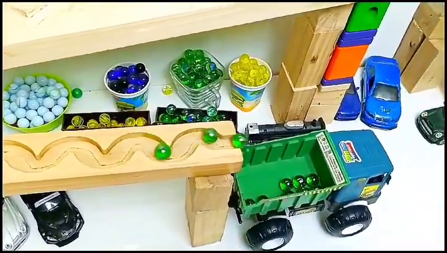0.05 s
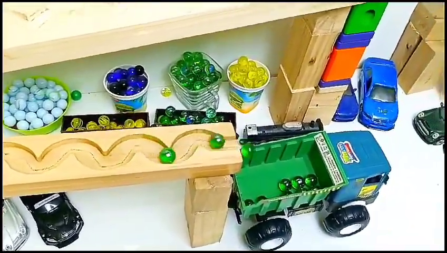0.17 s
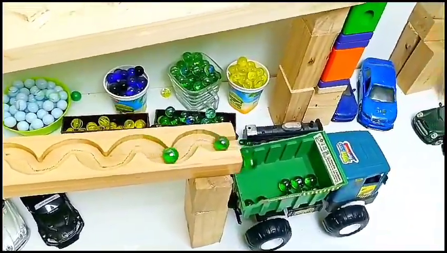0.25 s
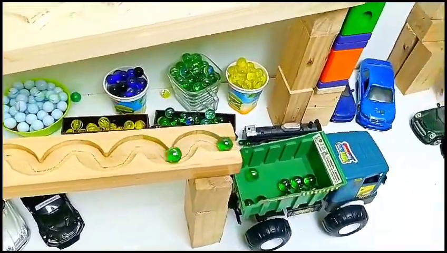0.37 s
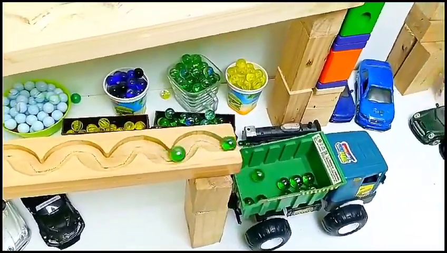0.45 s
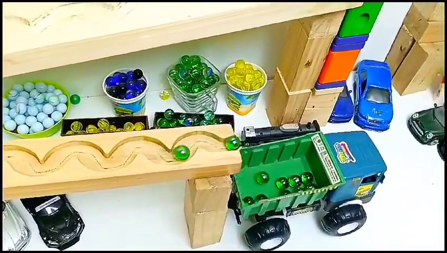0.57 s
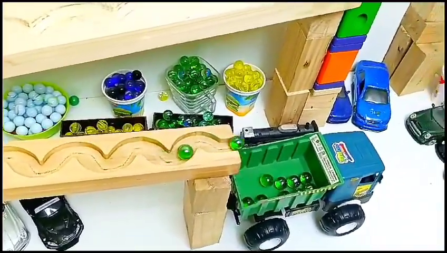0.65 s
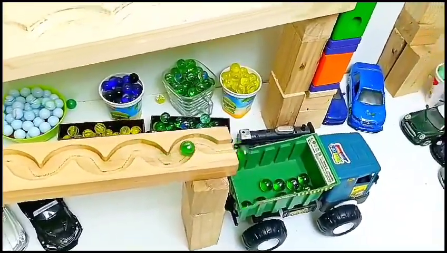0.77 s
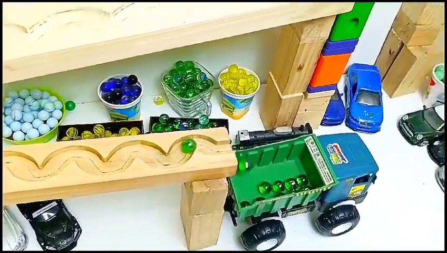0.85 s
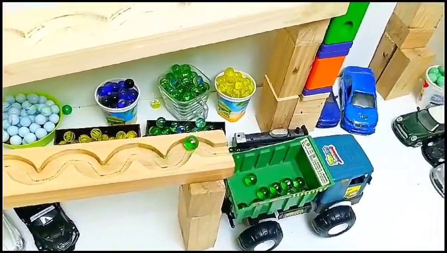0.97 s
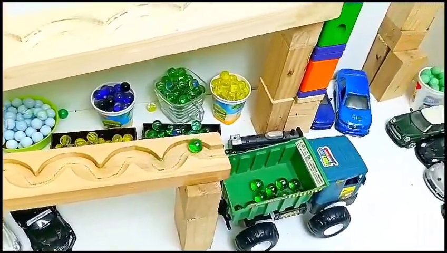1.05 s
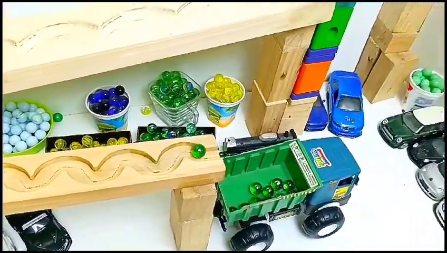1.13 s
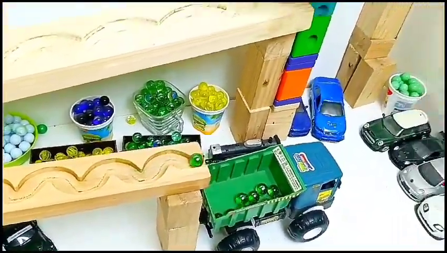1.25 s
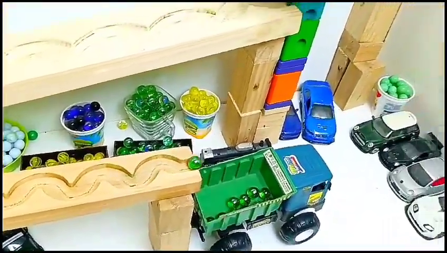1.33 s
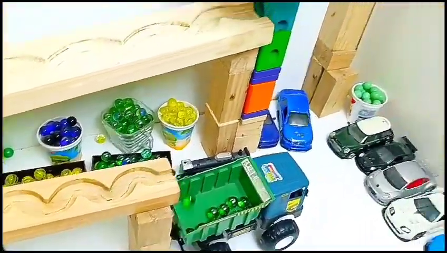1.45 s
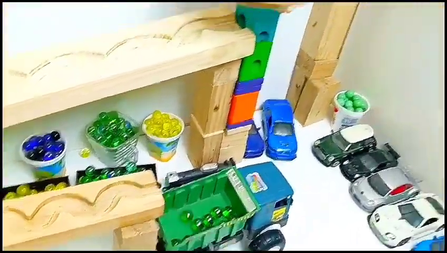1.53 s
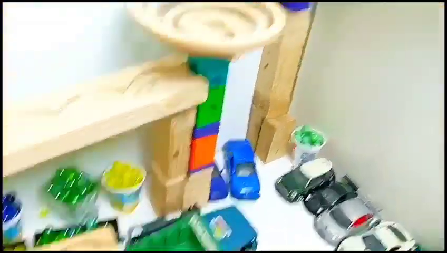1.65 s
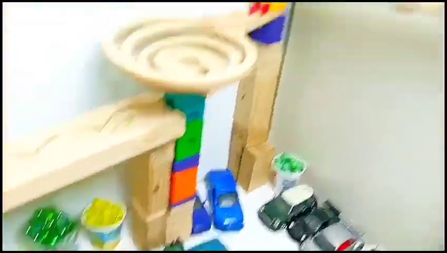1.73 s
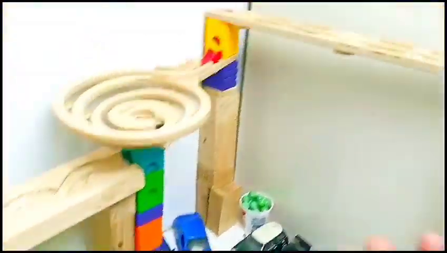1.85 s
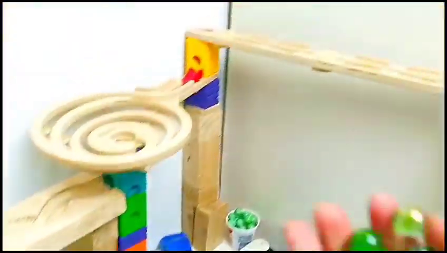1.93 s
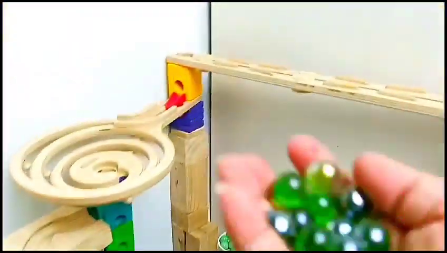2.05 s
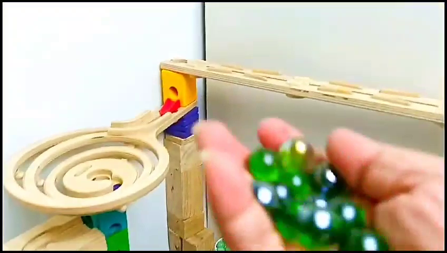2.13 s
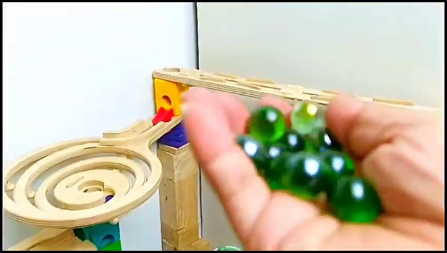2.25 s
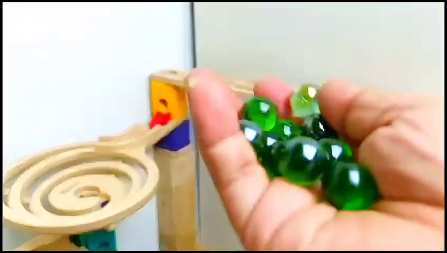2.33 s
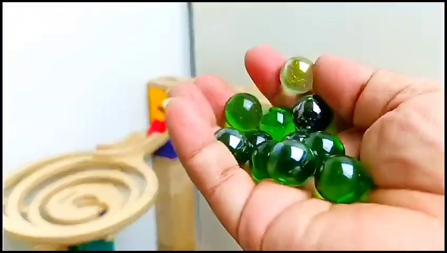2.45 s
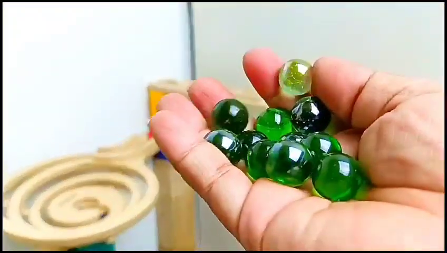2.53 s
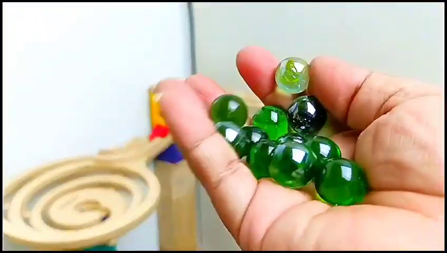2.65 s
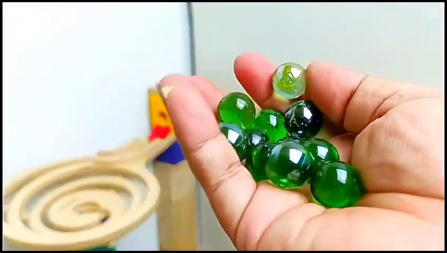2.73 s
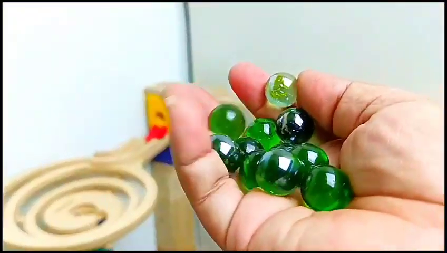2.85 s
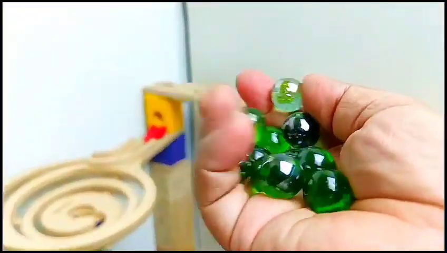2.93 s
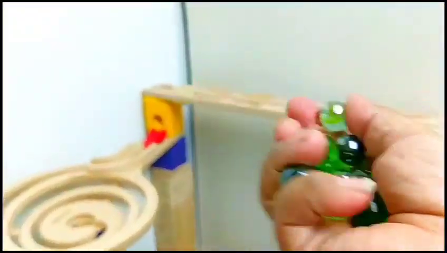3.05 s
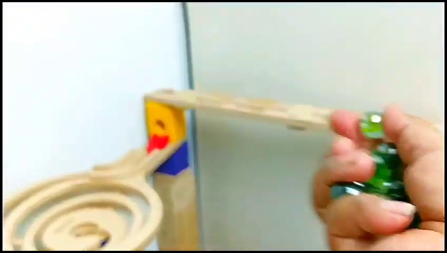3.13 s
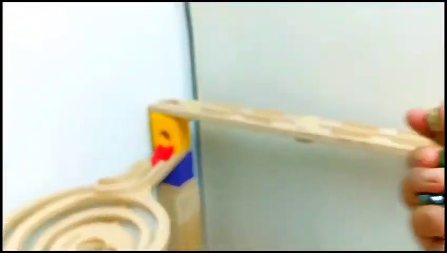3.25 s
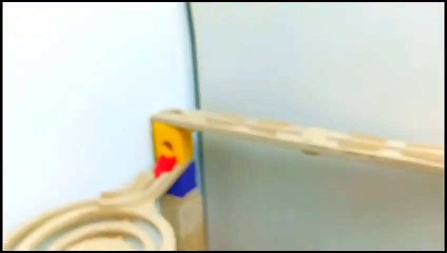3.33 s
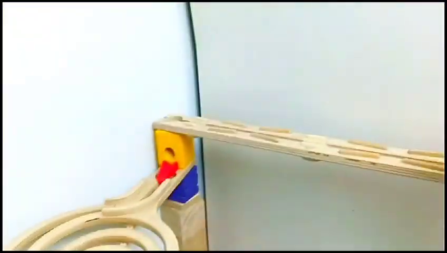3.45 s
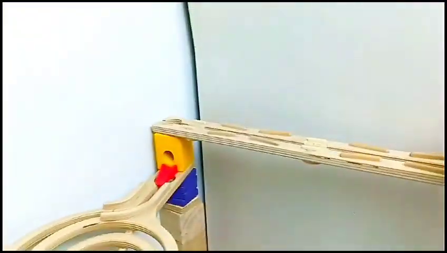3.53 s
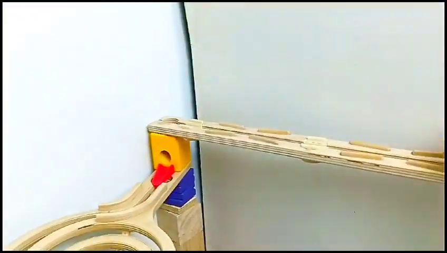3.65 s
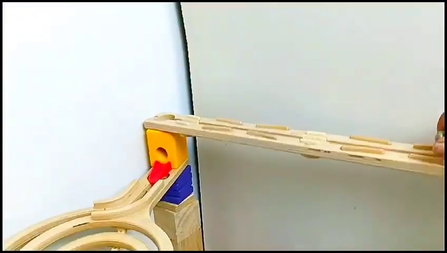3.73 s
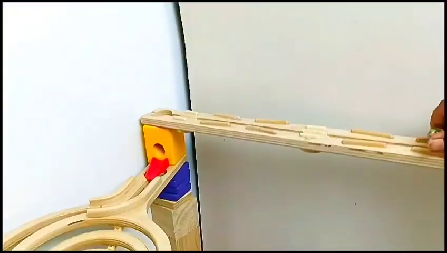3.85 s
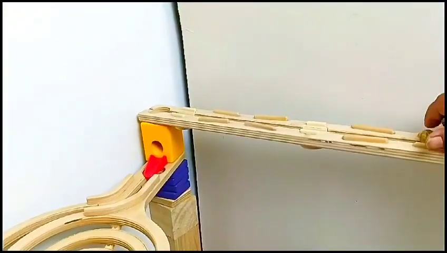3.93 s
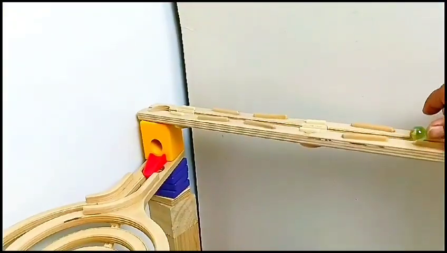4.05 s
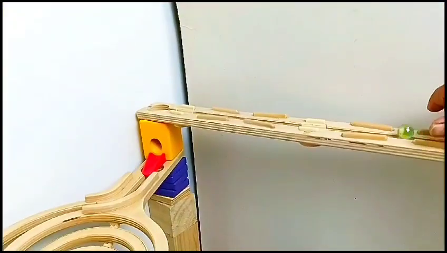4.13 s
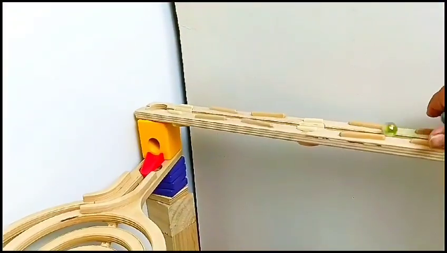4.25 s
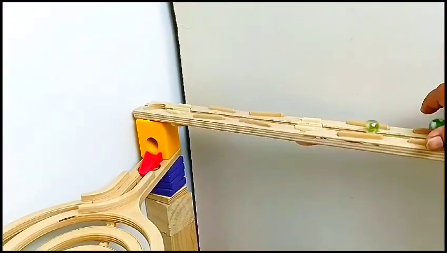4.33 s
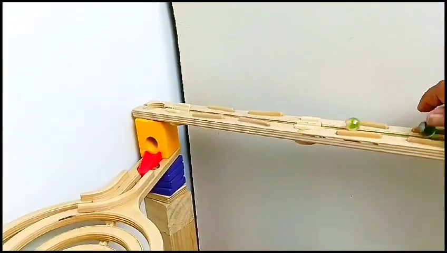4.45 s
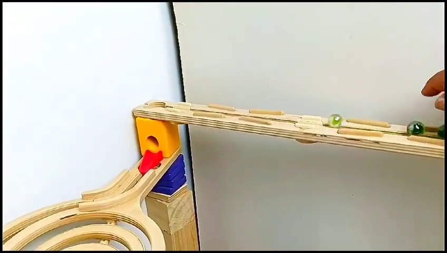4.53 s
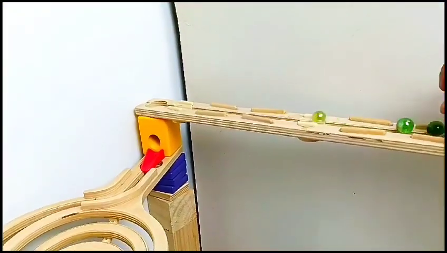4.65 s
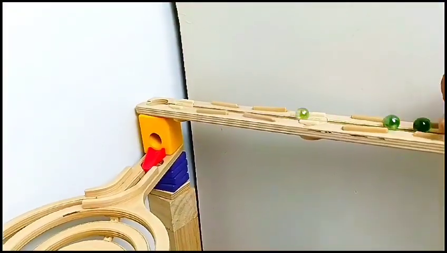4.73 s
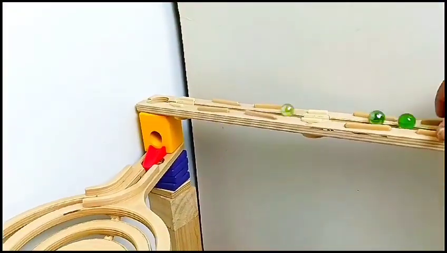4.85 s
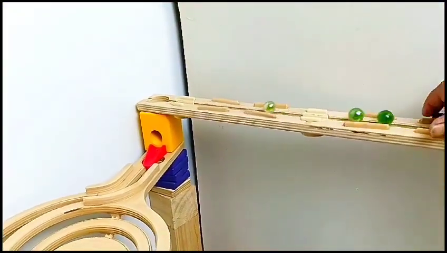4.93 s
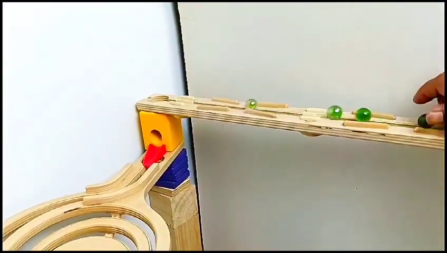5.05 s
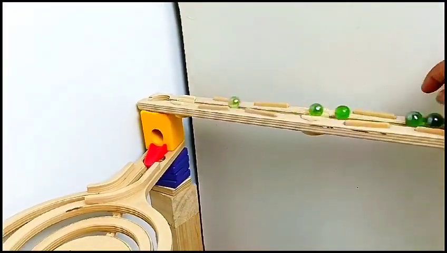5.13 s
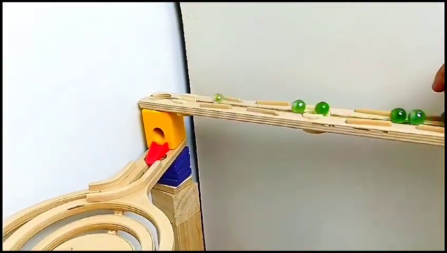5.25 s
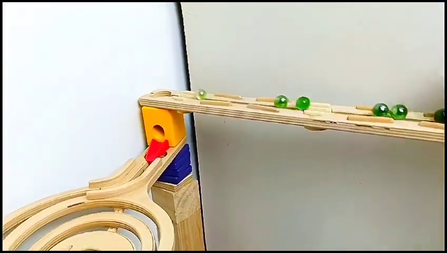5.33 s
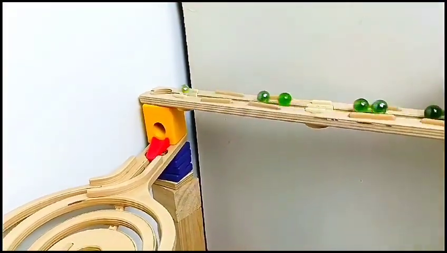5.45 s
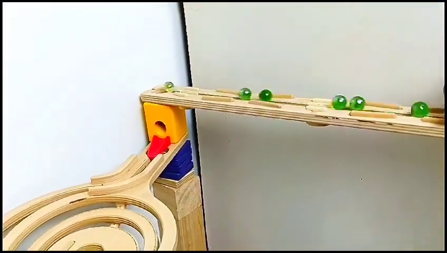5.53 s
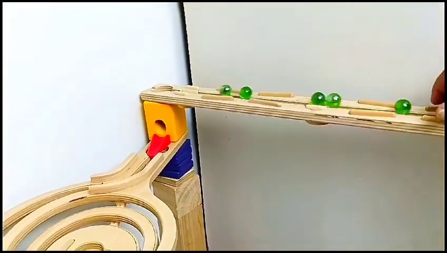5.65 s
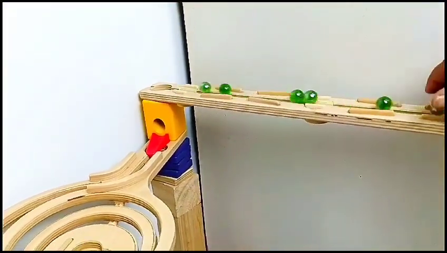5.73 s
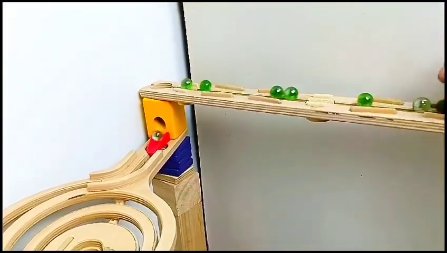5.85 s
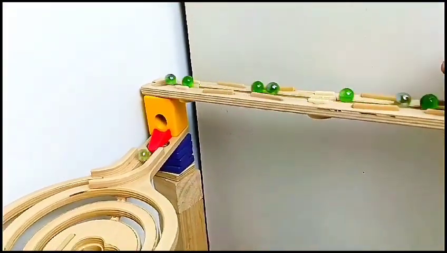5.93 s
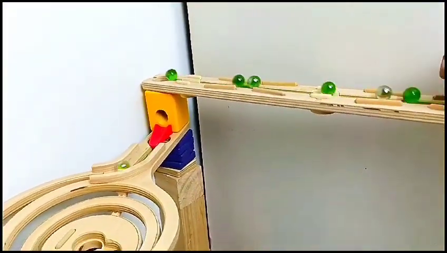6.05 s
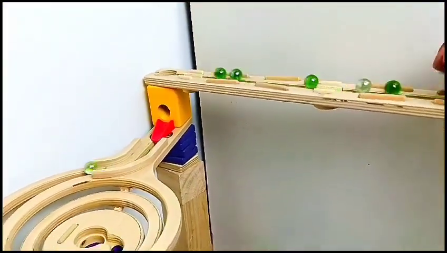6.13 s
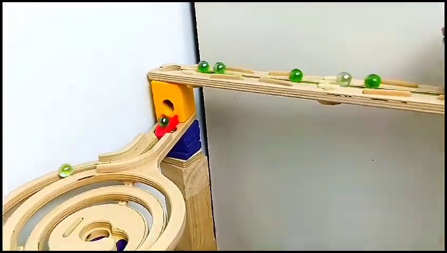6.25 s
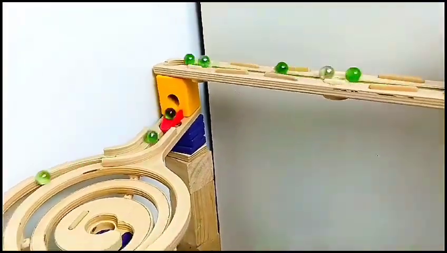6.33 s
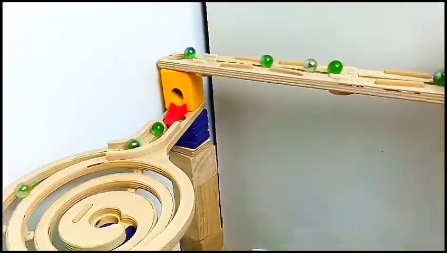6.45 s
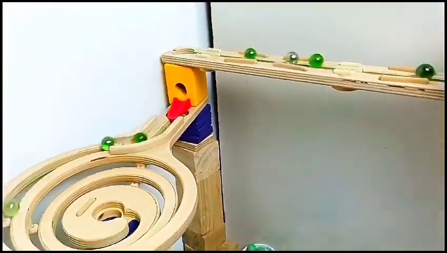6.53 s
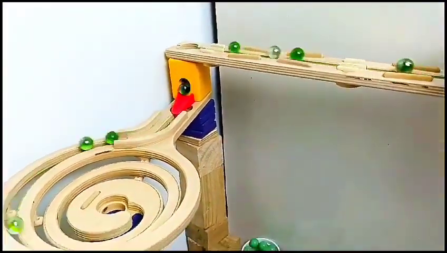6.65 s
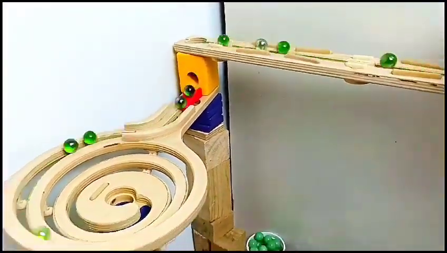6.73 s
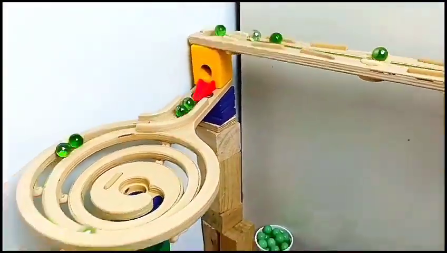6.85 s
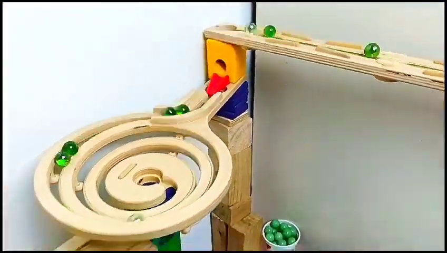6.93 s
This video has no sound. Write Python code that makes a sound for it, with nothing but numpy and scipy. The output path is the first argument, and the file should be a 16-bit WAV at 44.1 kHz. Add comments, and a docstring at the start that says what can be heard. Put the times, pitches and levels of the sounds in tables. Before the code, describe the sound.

Close stereo phone pickup in a hard, reverberant room: deep, stretched knocks and a low woody drone, a big hollow plastic blow, a tiny gap of silence, then bright marble drops rattling in a toy truck bed. Light glass ticking in the palm fades to near quiet. Wood knocks begin singly, multiply, and merge with rolling rumble and sharp glass clinks, loudest at the end over faint hush.

```python
"""Glass marbles on plastic and wood

Glass marbles drop into the plastic bed of a toy truck, click in a hand, then knock and roll down a wooden track.
Blows excite modes and broad slaps, glass contacts give short pulses, and dense small blows make the rolling.
A low drone, handling rumble, low thuds and steady hush lie beneath; a bare room adds reflections and a long echo.
The phone plays its first second slowed and lowered, falls silent briefly, then runs on at speed."""
import sys
import numpy as np
from scipy import signal
from scipy.fft import rfft, irfft
from scipy.io import wavfile
from scipy.ndimage import uniform_filter1d, map_coordinates

SR = 44100
rng = np.random.default_rng(int(sys.argv[2]) if len(sys.argv) > 2 else 0)


def persist_wave(psi):
    """Save psi, clipped to +-1, as 16-bit WAV."""
    counts = np.round(np.clip(psi, -1, 1) * 32767).astype(np.int16)
    wavfile.write(sys.argv[1], SR, np.atleast_2d(counts).T)


N = 307818

# All t/s are playback times; happened() converts them to times in the room.

# Marbles landing in the plastic bed, except the row at 1.0 s: the abrupt cut-in as sound returns
# at full speed. t/s, peak level/dB, left-right level/dB, nominal contact time/ms
DROPS = [(.696, -1, 0.2, .15), (0.719, -29, 4.5, .25), (.774, -11.5, 1, .4), (.824, -9, -1.3, .3),
         (.869, -18, -4, .3), (0.9, -18.5, -3.5, .3), (1.0, -23, 8, .25), (1.011, -15, -2, .4),
         (1.033, -24.5, -1.5, .3), (1.1165, -3.5, -3, .2), (1.148, -12, 1.1, .45), (1.172, -9.5, -.4, .1),
         (1.204, -10.5, -2.8, .4), (1.225, -20.5, 0.5, .4), (1.236, -24.5, 4.5, .4),
         (1.258, -20.5, -1.6, .3), (1.6355, -3, -0.2, .2), (1.654, -26.5, 0.5, .15), (1.672, -17, 5.4, .25),
         (1.689, -9, -2, .25), (1.71, -13, 1.5, .08), (1.739, -29, -2.5, .25)]
# Modes of the bed: f/Hz, bandwidth/Hz, level/dB
BED_MODES = [(598.5, 111.4, -1), (660, 96, 2.5), (830, 230, -6.5), (970, 92, -3.5), (968, 40, -3.5),
             (1286, 130, -1.5), (1295, 240, -15.5), (1510, 280, -7.5), (1580, 130, -9.5), (2440, 590, -9.5),
             (3200, 410, -3.5)]
# The bed's many modes too close to tell apart: f/Hz, level/dB per Hz
BED_SLAP = [(150, -56.5), (250, -36), (335, -20), (470, -24.5), (620, -9.5), (842, -4.5), (1090, -17),
            (1280, -2), (1990, -10.5), (3180, -18), (4330, -18.5), (9570, -17.5), (12000, -37.5),
            (15600, -69), (22000, -120)]


def drops():
    """Impact excitation: a shorter contact gives a broader force spectrum and so a brighter sound."""
    sounds = []
    for _, _, _, contact_ms in DROPS:
        body = ring(BED_MODES, BED_SLAP, spot_db=1.0, slap_db=1.1)
        sounds.append(np.convolve(body, blow(contact_ms)))
    return place(DROPS, sounds)


def settling():
    """Dissipation: a rattle in the bed swells after each row of DROPS and calms down."""
    gain = stirred(DROPS, under_db=-48, rise_s=.05, t60=.38)
    return rolling(gain, BED_MODES, BED_SLAP, per_s=180.0, spread_db=8.8)


# Marbles striking pegs and walls: t/s, peak level/dB, left-right level/dB,
# change of the deep board modes' level/dB, wall ring f/Hz as played back
KNOCKS = [(.042, -37, 8.5, -4.5, 1014), (.216, -38, 2, -12, 890), (.298, -16.5, 2, -8, 734),
          (.359, -30, 1.5, -16, 695), (.489, -31.5, 1.5, -22, 836), (4.0181, -20, -2, -2, 2870),
          (4.0557, -23, 1, -2, 1790), (4.447, -20.5, -7.5, -19, 3000), (4.4521, -16.5, -3, 3, 2000),
          (4.4843, -17, 3.5, 1, 2704), (4.5728, -16.5, 0, -19, 1810), (4.6144, -22.5, 0.5, -4, 2090),
          (4.7738, -31.5, -1.5, -7, 3260), (5.0423, -18, -4, 1.9, 2830), (5.0716, -25, 1.5, 5, 3180),
          (5.1265, -30, -1, -3, 2020), (5.155, -23.5, 1, 0.7, 2860), (5.2185, -34.5, -1, -3, 2210),
          (5.3009, -14, -1.5, -4, 2800), (5.358, -21.5, -2, -10, 2730), (5.3897, -25.5, 4, 7.5, 3070),
          (5.4243, -35, 13, -3, 2740), (5.4535, -26, 1, -2.5, 2870), (5.5489, -32, 3, 3, 2840),
          (5.6351, -30.5, 2, 14.5, 2730), (5.7783, -16.5, 0.5, -13, 2290), (5.793, -14, 4.5, -1, 2786),
          (5.8318, -17.5, 6, 2.5, 2780), (5.8983, -21, -3.5, -1, 2220), (5.9795, -24, 4, -19, 2870),
          (6.0686, -22.5, -0.5, -6, 3610), (6.1601, -36.5, 9, 13, 2960), (6.1903, -16.5, 2, -4.5, 2630),
          (6.256, -22, -2, -37, 3040), (6.2724, -15, -3.5, -13, 3110), (6.3238, -15, 3.5, 4, 2790),
          (6.3607, -18, 3.5, -6, 2330), (6.483, -18, -1, -5.5, 2130), (6.5945, -25, -7.5, -33, 3360),
          (6.628, -17, 0, -6, 2930), (6.669, -17, -0.5, -1.5, 3110), (6.7557, -9, -2.5, -5, 2667),
          (6.8227, -18, -4, -3, 3840), (6.8598, -23.5, 4.5, -22, 3370), (6.9113, -24, 0, -8, 2850),
          (6.9638, -31, -13, 4, 3130)]
# Modes of the track: f/Hz, bandwidth/Hz, level/dB
TRACK_MODES = [(337, 17, -10), (446, 17, -19.5), (503.5, 23, 3), (719, 21, -7.5), (856.5, 35, -6),
               (1264, 140, -11.5), (1446, 120, -6.5), (2219, 64, -9.5), (2770, 24, -1), (3070, 190, -12.5),
               (3750, 61, -14), (4187, 40, -11.5)]
# The track's broad slap: f/Hz, level/dB per Hz
TRACK_SLAP = [(110, -41.5), (180, -18), (429, -11.5), (497, 1.5), (575, -19.5), (712, -10), (972, -18.5),
              (2770, -6), (4240, -13.5), (6380, -36.5), (9000, -34), (11700, -58.5), (19800, -120)]


def knocks():
    """Modal excitation: the board's deep modes and the nearest wall's ring vary from blow to blow."""
    deep_below_hz = 800
    deep_slap_db = 6  # extra bass of the slap over the change of the deep modes
    wall_width_hz, wall_db = 100, -1
    sounds = []
    for s, _, _, deep_db, wall_hz in KNOCKS:
        modes = [(hz, width, db + deep_db * (hz < deep_below_hz)) for hz, width, db in TRACK_MODES]
        modes.append((pitch_in_room(s, wall_hz), wall_width_hz, wall_db))
        slap = [(hz, db + (deep_db + deep_slap_db) * (hz < deep_below_hz)) for hz, db in TRACK_SLAP]
        body = ring(modes, slap, spot_db=2.6, slap_db=-1.5)
        sounds.append(np.convolve(body, blow(.06)))
    return place(KNOCKS, sounds)


# Steady roll of the marbles under way: t/s, level/dB
ON_TRACK = [(-.3, -59), (0.0, -52.5), (.3, -57.5), (.8, -73), (1.0, -91.5), (3.98, -85), (4.03, -64),
            (4.4, -82.5), (5.0, -64), (5.6, -56), (6.1, -47), (6.98, -43)]


def track_rolling():
    """Power addition: a steady roll combines with the commotion stirred up by every knock."""
    after_knocks = stirred(KNOCKS, under_db=-28, rise_s=.015, t60=.39)
    gain = np.hypot(level(ON_TRACK), after_knocks)
    return rolling(gain, TRACK_MODES, TRACK_SLAP, per_s=500., spread_db=4.5)


def rolling(gain, modes, slap, per_s, spread_db):
    """Granular excitation: dense small blows of uneven size drive the modes of a body."""
    out = np.zeros((2, N))
    for pan in (.3, .5, .7):  # three paths, each a share of left and right
        size = gain_of(spread_db * np.minimum(rng.exponential(1, N), 5))
        grit = size * (rng.random(N) < per_s / SR)
        grit *= rng.choice([-1., 1.], N)
        path = signal.oaconvolve(grit, ring(modes, slap, spot_db=.83, slap_db=-1.1))[:N]
        delay = int(40 * (1 - pan) - 8)  # samples
        out += [pan * np.roll(path, delay), (1 - pan) * path]
    return evened(out) * gain


# Glass on glass: t/s, peak level/dB, left-right level/dB, f/Hz as played back
CLICKS = [(-.022, -24.5, 7, 3450), (0.042, -30.5, -12, 3270), (0.088, -29, -8, 3340),
          (.2942, -40.5, -24, 3180), (.3586, -37.5, -6, 3130), (.5212, -49.5, -11.5, 3050),
          (.6983, -17.5, -7, 3055), (1.0003, -18, 3.5, 8920), (1.0526, -28, 0, 9210),
          (1.1162, -9.5, 4, 4400), (1.2488, -21.5, 1.5, 8440), (1.4691, -22, -19, 8650),
          (1.482, -24, -12, 8300), (1.562, -35, -9.5, 8350), (1.6349, -14.5, -1, 5040),
          (1.7148, -9, 3.5, 9570), (1.915, -38, -2, 7740), (2.1624, -36, 9, 9300), (2.1736, -25, 2.5, 8340),
          (2.2, -23, 4, 9030), (2.2145, -19, 4.5, 9600), (2.2657, -20, 2.5, 10300), (2.3163, -39, 1, 9400),
          (2.415, -37, 5.5, 9970), (2.4705, -43, 5, 8570), (2.702, -41, -3, 8270), (2.8471, -41, 5, 8000),
          (2.9214, -49, 9.5, 9530), (3.145, -27, 9, 8260), (3.2083, -50, 3.5, 8400), (3.243, -47, 2, 4400),
          (3.296, -34, 9, 5700), (3.354, -25.5, 4.5, 7970), (3.4226, -38, -2.5, 4650),
          (3.4261, -32.5, 0, 4870), (3.58, -36, -5.5, 5630), (4.452, -39.5, -13.5, 4306),
          (4.5534, -29, 2.5, 4330), (5.0436, -34.5, 1, 4260), (5.2674, -38.5, -7.5, 4300),
          (5.3036, -16.5, -6, 4140), (5.547, -27.5, 1.5, 4440), (5.6596, -41.5, 15.5, 8800),
          (5.7597, -18.5, -5, 7600), (5.779, -8.5, -1, 6940), (5.968, -20, .5, 5770),
          (5.976, -21.5, 2.5, 6230), (5.99, -21.5, 2, 5180), (6.0704, -26.5, 5.5, 5030),
          (6.1599, -14, -2, 5070), (6.1908, -15.5, 0, 7650), (6.2557, -10.5, 1, 9040),
          (6.2743, -9, 1, 6040), (6.3548, -12.5, 1.5, 5280), (6.4647, -17.5, 1, 6470),
          (6.4835, -17, 0.5, 5800), (6.5946, -15, 2, 7900), (6.634, -19, 4, 7600), (6.6694, -13, 3, 8000),
          (6.6833, -7.5, -4, 7800), (6.7559, -12, 4.5, 4430), (6.823, -13.5, 4.5, 8700),
          (6.872, -13, 2, 5750)]


def clicks():
    """Elastic collision: single clinks stand over a chatter that swells after rows of CLICKS and DROPS."""
    single = place(CLICKS, [clink(pitch_in_room(s, hz)) for s, _, _, hz in CLICKS])
    size = gain_of(1.3 * np.minimum(rng.exponential(1, (2, N)), 5))
    grit = size * (rng.random((2, N)) < 250. / SR)  # 250 contacts a second in each channel
    grit = grit + .72 * grit[::-1]  # each channel leaks into the other
    chatter = signal.oaconvolve(grit, clink(9000.0)[None], axes=1)[:, :N]
    return single + evened(chatter) * stirred(CLICKS + DROPS, under_db=-42, rise_s=.04, t60=.23)


def clink(hz, cycles=0.27, ring_db=-21.0, ring_t60=0.014):
    """Contact radiation: two hard spheres give a pulse of a cycle or two and a faint short ring."""
    t = np.arange(900) / SR
    tone = np.sin(2 * np.pi * hz * t)
    pulse = np.diff(tone * t * np.exp(-t * hz / cycles), prepend=0)
    return pulse / abs(pulse).max() + tone * gain_of(ring_db - 60 * t / ring_t60)


# A marble enters the hollow block: t/s, peak level/dB, left-right level/dB, f/Hz
PINGS = [(5.7603, -30.5, 5, 3150), (6.1587, -25, 2, 3050), (6.2544, -19.5, 4, 3180),
         (6.5958, -19.5, 9.5, 3110), (6.6696, -19, 3, 3120)]


def pings(t60=0.027):
    """Single-mode decay: the block sounds one clear, exponentially dying tone."""
    t = np.arange(3000) / SR
    decay = gain_of(-60 * t / t60)
    return place(PINGS, [np.sin(2 * np.pi * hz * t) * decay for _, _, _, hz in PINGS])


# The board by the truck drones under rolling marbles: t/s, level/dB
DRONE = [(0.0, -73), (.08, -62), (.172, -50), (.252, -68), (.3, -34), (.36, -46), (.638, -61.5),
         (.694, -44.5), (.77, -64.5), (.93, -50)]


def drone(hz=340.0, width=110.0):
    """Resonance: noise passes twice through one low resonance of the board."""
    b, a = signal.iirpeak(hz, hz / width, SR)
    once = signal.lfilter(b, a, rng.standard_normal(N))
    return evened(signal.lfilter(b, a, once)) * level(DRONE)


# Rumble of the moving phone: t/s, level/dB
HANDLING = [(0, -67), (.93, -71), (1.0, -76), (1.37, -82), (1.48, -53.5), (1.56, -74), (1.83, -50.5),
            (2.0, -70), (2.08, -45), (2.14, -53.5), (2.98, -80), (3.73, -85.5), (3.88, -62), (4.0, -73.5),
            (4.06, -45.5), (4.25, -58.5), (4.7, -54.5), (5.0, -62), (5.75, -54.5), (5.95, -49.5),
            (6.98, -55.5)]
# Its spectrum, used below 260 Hz: f/Hz, level/dB per Hz
RUMBLE = [(12, -56), (25, -31), (91, 7), (108, -1), (146, -7.5), (260, -7), (340, -32), (570, -120)]
# Single low thuds: t/s, peak level/dB, left-right level/dB, f/Hz as played back
THUDS = [(0.3, -40, 1, 113), (1.45, -58.5, 31, 102.9), (1.83, -46, -13, 118), (2.069, -37.5, -28.5, 118),
         (4.038, -34, -14, 151), (5.999, -37, -26.5, 117)]


def handling():
    """Structure-borne sound: lumpy rumble and a few single low thuds, without the room."""
    lumps_db, lump_s = 4., .087  # spread and length of the swells
    hz = np.fft.rfftfreq(N, 1 / SR)
    a, b = rng.standard_normal((2, N))
    ports = [a + .5 * b, .96 * (a - .5 * b)]  # partly alike
    rumble = irfft(rfft(ports) * gain_of(read(RUMBLE, hz)) * (hz < 260), N)
    lump = np.hanning(int(2 * lump_s * SR))
    lumps = evened(signal.oaconvolve(rng.standard_normal(N), lump, "same"))
    shaken = stirred(KNOCKS, under_db=-40, rise_s=.11, t60=.17)  # through hand and phone after a knock
    rumble = evened(rumble * gain_of(lumps_db * lumps)) * np.hypot(level(HANDLING), shaken)
    t = np.arange(2000) / SR
    pitches = [pitch_in_room(s, f) for s, _, _, f in THUDS]
    thuds = [np.sin(2 * np.pi * f * t) * t * np.exp(-t * f / .32) for f in pitches]
    return rumble + place(THUDS, thuds)


# Background spectrum: f/Hz, level/dB per Hz before scaling
HUSH = [(18, -48), (30, -24), (48, -20.5), (106, -3.5), (328, -13), (569, -11.5), (2010, -13),
        (4910, -26.5), (8080, -27.5), (14800, -32.5), (16000, -49.5)]


def hush(rms_db=-72.5):
    """Stationary noise: the steady background of the room."""
    spectrum = gain_of(read(HUSH, np.fft.rfftfreq(512, 1 / SR)))[:, None]
    return gain_of(rms_db) * evened(noise(spectrum, N // 128 + 5)[:, :N])


# Decay of the room: f/Hz, t60/s
ECHO = [(100, 0.67), (300, 2.1), (700, 1.85), (1800, 1.91), (4800, 0.83), (9000, 0.62), (14000, 0.49)]
# Share the walls return: f/Hz, level/dB
THROWN = [(300, -3), (1000, 4), (3000, 4), (6000, 6.5), (10000, 7), (15000, 5)]


def room(x, near_db=2.0, near_t60=0.038, walls_db=-3.5, walls_share=0.23, echo_db=-6.5):
    """Reverberation: reflections off nearby things, the first walls, then the bare room's long echo."""
    hz, t = np.fft.rfftfreq(512, 1 / SR)[:, None], np.arange(700) * 128 / SR
    fall_db = -60 * t / read(ECHO, hz)
    echo = noise(gain_of(fall_db), 700)
    walls = noise(gain_of(fall_db / walls_share), 700)  # walls_share shortens the decay time
    t = np.arange(echo.shape[1]) / SR

    shape = (gain_of(-60 * t / near_t60) * (t > .0006))[:4096]
    near = noise(1., 700)[:, :4096] * shape
    for _ in range(6):  # many small scatterers favour no pitch: even out the spectrum, keep the decay
        near = irfft(rfft(near) / abs(rfft(near)))
        near *= shape / np.sqrt(uniform_filter1d(near ** 2, size=100) + 1e-12)
    same = np.clip(read(LIKENESS, np.fft.rfftfreq(4096, 1 / SR)), 0, 1)
    left, right = rfft(near)
    near = irfft([left, same * left + np.sqrt(1 - same ** 2) * right])  # long waves reach both ports alike
    near = gain_of(near_db) * near / np.linalg.norm(near, axis=1, keepdims=True)

    far = 0
    for db, part, rise_s in ((walls_db, walls, .012), (echo_db, echo, .02)):
        far = far + gain_of(db) * part / np.linalg.norm(part[0]) * np.clip(t / rise_s, 0, 1)
    far = irfft(rfft(far) * gain_of(read(THROWN, np.fft.rfftfreq(len(t), 1 / SR))), len(t))
    nearby = signal.oaconvolve(x, near, axes=1)[:, :N]
    distant = signal.fftconvolve(x.mean(0)[None], far, axes=1)[:, :N]
    return x + nearby + distant


# Left-right likeness of diffuse sound: f/Hz, coherence (0 to 1)
LIKENESS = [(60, .3), (150, 0), (300, 1), (600, .5), (1200, 0.012), (3000, 0.024)]


def noise(magnitude, frames):
    """Diffuse field: random short-time spectra whose likeness at two ports depends on frequency."""
    a, b, c, d = rng.standard_normal((frames, 257, 4)).T
    same = np.clip(read(LIKENESS, np.fft.rfftfreq(512, 1 / SR)), -1, 1)[:, None]
    left, other = a + 1j * b, c + 1j * d
    z = np.array([left, same * left + np.sqrt(1 - same ** 2) * other])
    return signal.istft(z * magnitude, nperseg=512, noverlap=384)[1]


def ring(modes, slap, spot_db, slap_db):
    """Modal superposition: dying modes, weighted at random for the spot struck, over a causal slap."""
    hz, width, db = np.transpose(modes)[:, :, None]
    t = np.arange(2048) / SR
    luck = rng.standard_normal((len(modes), 1))
    tones = gain_of(db + spot_db * luck) * np.exp(-np.pi * width * t) * np.sin(2 * np.pi * hz * t)
    tones[::2] *= -1  # neighbouring modes in opposition leave no hollow between them
    slap_level = slap_db + read(slap, abs(np.fft.fftfreq(4096, 1 / SR)))
    log_gain = np.log(gain_of(np.maximum(slap_level, -100)))
    minimum_phase = np.exp(np.conj(signal.hilbert(log_gain)))
    broad = np.fft.ifft(minimum_phase).real[:2048]
    return (tones * 2 * np.pi * width / SR).sum(0) + broad


def blow(ms):
    """Contact mechanics: a smooth force pulse of about ms, plus a sample or two."""
    return np.hanning(int(ms * SR / 1000) + 3)


def stirred(events, under_db, rise_s, t60):
    """Energy decay: gain of a commotion that swells after each event and dies away; the powers add."""
    start = happened([row[0] for row in events])[:, None]
    since = np.maximum(np.arange(N) / SR - start, 0)
    db = np.array([row[1] for row in events])[:, None] + under_db - 60 * since / t60
    return np.sqrt(((gain_of(db) * np.minimum(since / rise_s, 1)) ** 2).sum(0))


def place(events, sounds, lag_per_db=-1.5, lag=8.8):
    """Interaural cues: each peak level splits left and right; delay in samples follows the difference."""
    out = np.zeros((2, N + SR))
    for (s, db, pan_db, *_), sound in zip(events, sounds):
        late = np.clip(lag + lag_per_db * pan_db, -22, 22) / 2
        for side, sign in enumerate((1, -1)):
            at = int(happened(s) * SR + sign * late)
            out[side, at:at + len(sound)] += gain_of(db + sign * pan_db / 2) * sound / abs(sound).max()
    return out[:, :N]


def gain_of(db):
    """Logarithmic level: decibels to amplitude gain."""
    return 10 ** (np.asarray(db) / 20)


def evened(x):
    """Effective value: scales to rms 1."""
    return x / np.sqrt(np.mean(x ** 2) + 1e-20)


def read(points, hz):
    """Logarithmic pitch axis: interpolates a spectrum table over log frequency."""
    f, value = np.transpose(points)
    return np.interp(np.log(hz + 1), np.log(f + 1), value)


def level(curve):
    """Envelope: gain of a t/s, level/dB curve, -120 dB outside it."""
    s, db = np.transpose(curve)
    return gain_of(np.interp(np.arange(N) / SR, happened(s), db, -120, -120))


SLOWED = 2.5  # slow-motion factor
SKIP_S, RESUME_S = .930, .997  # playback times: end of slow motion, return to speed


def happened(s):
    """Time scaling: moment in the room of what is played back at s; the skipped stretch is lost."""
    s = np.asarray(s, float)
    slow = SKIP_S - np.maximum(SKIP_S - s, 0) / SLOWED
    return np.where(s < RESUME_S, slow, s)


def pitch_in_room(s, hz):
    """Frequency scaling: slow motion lowers pitch, so the source in the room lies higher."""
    return hz * (SLOWED if s < SKIP_S else 1)


def scene():
    """Superposition: all sources add up, at the speed at which they happened."""
    marbles = drops() + settling() + knocks() + track_rolling() + clicks() + pings()
    no_bass = signal.butter(4, 230., "high", fs=SR, output="sos")
    marbles = signal.sosfilt(no_bass, marbles)  # small bodies radiate no bass
    return room(marbles) + drone() + handling() + hush()


# Colour of the microphone port: f/Hz, level/dB
MIC = [(5000, 1.5), (6800, -3), (8500, 4), (10000, -0.5), (12000, -9.5), (15000, 2)]


def record(dry):
    """Transduction: microphone colour, band limit and overload, then a stretched opening and short silence."""
    mic_edge_hz, fade_hz, edge_hz = 17100, 15900, 16500  # low-pass cutoffs
    taken = irfft(rfft(dry) * gain_of(read(MIC, np.fft.rfftfreq(N, 1 / SR))), N)
    mic_edge = signal.firwin(255, mic_edge_hz, window=("kaiser", 8), fs=SR)
    taken = signal.oaconvolve(taken, mic_edge[None], "same")
    taken = .9 * np.tanh(taken / .9)  # the loudest blows overload the input softly
    no_deep_bass = signal.butter(2, 45., "high", fs=SR, output="sos")
    taken = signal.sosfilt(no_deep_bass, taken)

    t = np.arange(N) / SR
    played = np.array([map_coordinates(side, [happened(t) * SR], order=5) for side in taken])
    # the silence: fades out over 30 samples, back in over 120
    played *= np.clip(np.maximum(SKIP_S - t, (t - RESUME_S) / 4) * SR / 30, 0, 1)
    played = signal.oaconvolve(played, signal.firwin(101, fade_hz, fs=SR)[None], "same")
    edge = signal.firwin(511, edge_hz, window=("kaiser", 9), fs=SR)
    return signal.oaconvolve(played, edge[None], "same")


dry = scene()
out = record(dry)
persist_wave(out)
```